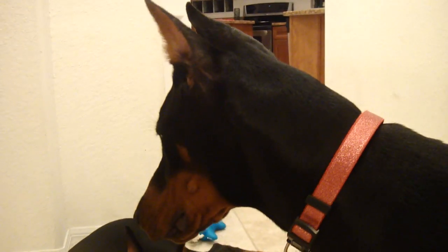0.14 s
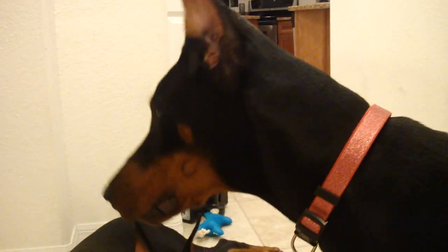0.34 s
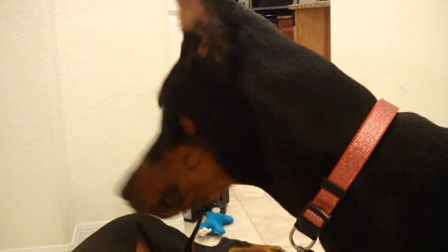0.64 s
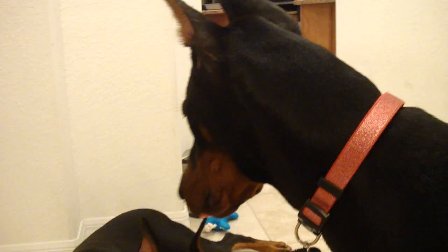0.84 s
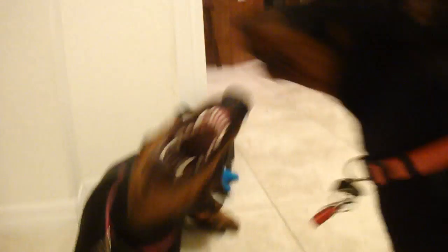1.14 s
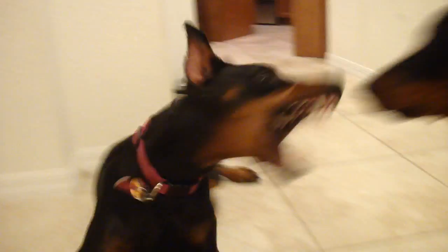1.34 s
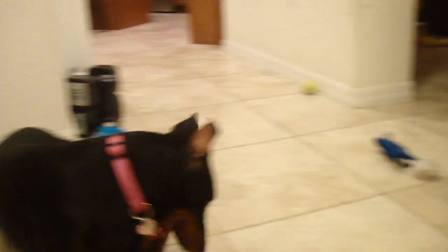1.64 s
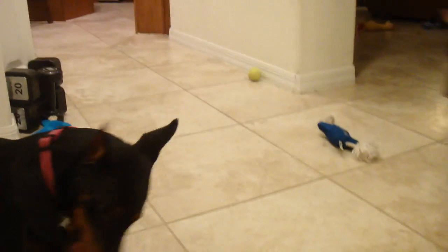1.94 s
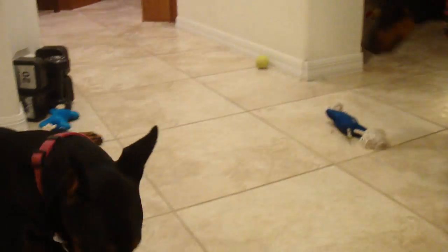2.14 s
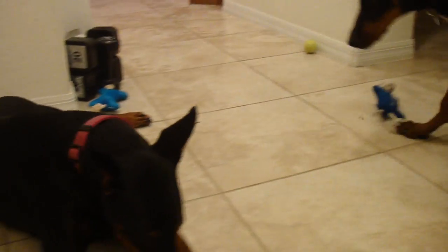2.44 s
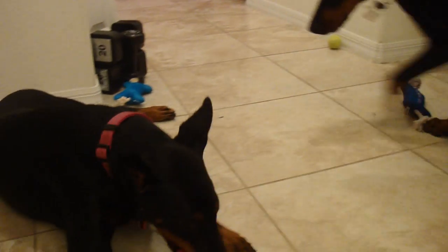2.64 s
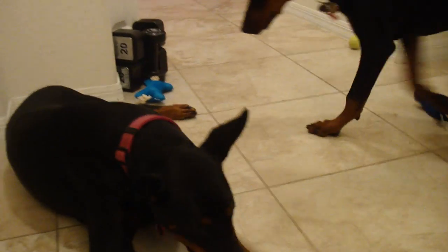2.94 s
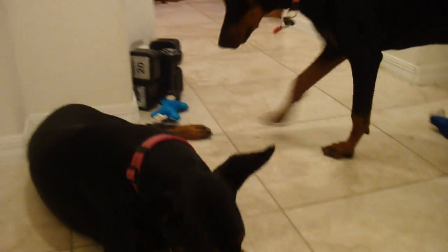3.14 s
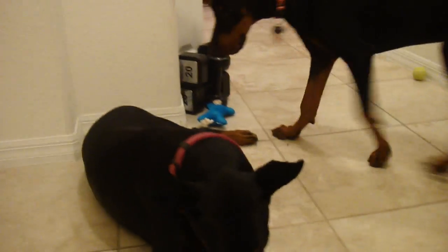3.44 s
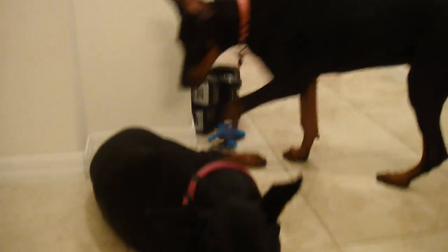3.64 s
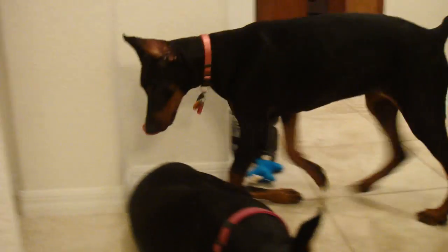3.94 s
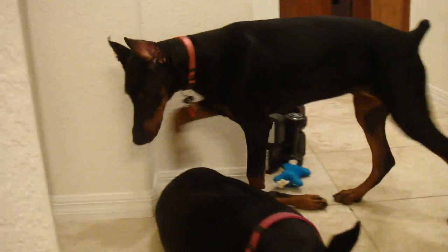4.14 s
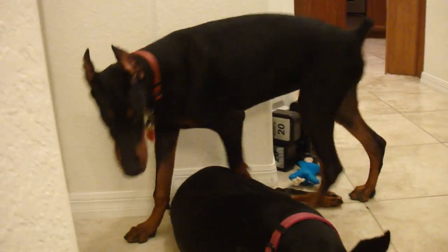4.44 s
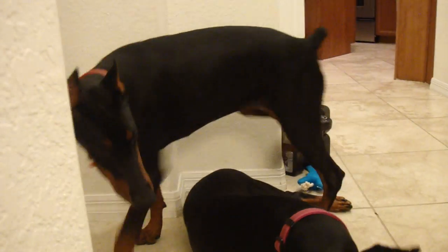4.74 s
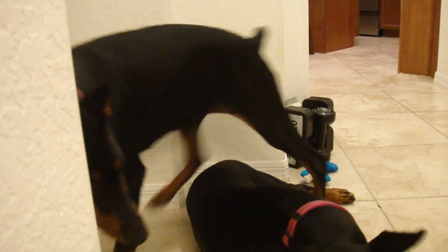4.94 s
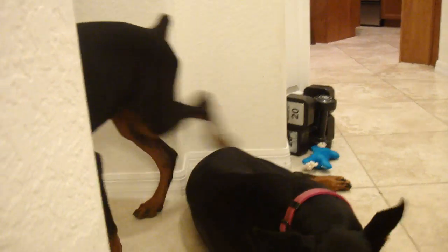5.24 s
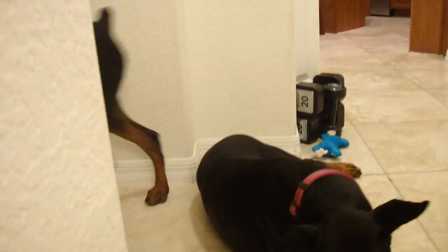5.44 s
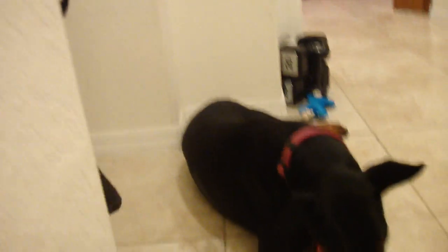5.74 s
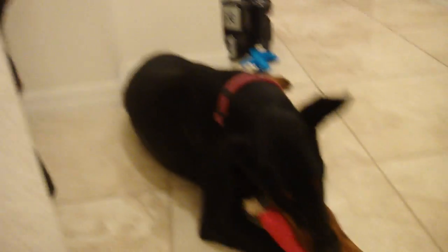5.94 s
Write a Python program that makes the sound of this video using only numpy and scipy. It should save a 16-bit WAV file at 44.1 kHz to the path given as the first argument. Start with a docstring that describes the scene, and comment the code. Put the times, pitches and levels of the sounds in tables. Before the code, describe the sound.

For the first second there is only soft room hiss and a very faint low hum, with a tiny click just before 0.9. At about 1.05 a sharp knock and a snarling burst break out, with further rough bursts near 1.17, 1.36 and 1.52, mixed with claw and tooth clicks and bright collar-tag clinks. A heavy, dull thump lands on tile at 1.72 and rings in the room. Scrabbling fades while tags jingle irregularly until about 2.7, with small scuffs near 2.4. From 2.75 a close rubber toy is chewed: quick squeaks at roughly 3.1, 3.7, 4.0, 4.4, 4.9 and 5.4 flip upward and fall, the one at 4.9 highest and shrillest. Steadier, nasal refill squeaks answer between them, the last just before 6. Light tag rattle and a click at 5.2 accompany the chewing.

```python
"""A rubber squeaker is chewed by one of two dogs, after a snarling scuffle on a tiled floor and a toy's thump.
Each bite drives its reed up in pitch and back; the toy refilling gives a steadier note. Both are harmonic
series filtered by toy, tube and jaws. Collar tags jingle as struck damped modes. Snarls and scrabbling are
bursts of filtered grainy noise; clicks and thumps are short band-limited impacts. A reverberant room,
coloured noise and a far appliance's hum lie behind them, and a gain control follows the loud moments."""
import sys
import numpy as np
from scipy import signal
from scipy.fft import rfft, irfft, next_fast_len
from scipy.io import wavfile
from scipy.ndimage import uniform_filter1d

SR = 44100
rng = np.random.default_rng(int(sys.argv[2]) if len(sys.argv) > 2 else 0)


def master_out(mix):
    """Clip the mix to full scale and print it as 16-bit PCM to the path in sys.argv[1]."""
    frames = np.transpose(np.atleast_2d(mix))
    ceiling = np.clip(frames, -1, 1)
    pcm = np.round(ceiling * 32767).astype(np.int16)
    wavfile.write(sys.argv[1], SR, pcm)


N = 269010
CUTOFF_HZ = 11250   # top of the squeaker's harmonics and of the recorder's passband


def amp(db):
    """Decibels are logarithmic: 20 dB is a factor of ten in amplitude."""
    return 10 ** (np.asarray(db) / 20)


def rms_one(x):
    """Normalisation: divide by the root mean square."""
    return x / np.sqrt(np.mean(x ** 2) + 1e-20)


def at_hz(points, hz):
    """Interpolation of a (frequency [Hz], value) table on a logarithmic frequency axis."""
    points = np.array(points)
    return np.interp(np.log(np.maximum(hz, 1)), np.log(points[:, 0]), points[:, 1])


def band_pass(x, low_hz, high_hz, order=2):
    """Band limiting: keep what lies between two edges."""
    return signal.sosfilt(signal.butter(order, [low_hz, high_hz], "band", fs=SR, output="sos"), x)


def high_pass(x, hz, order=2):
    """High-pass filtering: weaken what lies below the edge."""
    return signal.sosfilt(signal.butter(order, hz, "high", fs=SR, output="sos"), x)


def coloured(x, spectrum):
    """Spectral shaping: multiply the Fourier transform by a gain curve, then bring the rms to 1."""
    size = next_fast_len(len(x))
    gain = amp(at_hz(spectrum, np.fft.rfftfreq(size, 1 / SR)))
    return rms_one(irfft(rfft(x, size) * gain, size)[:len(x)])


def add(out, s, sound):
    """Superposition: mix a short sound in at time s."""
    i = int(round(s * SR))
    out[i:i + len(sound)] += sound[:N - i]


def squeaks(courses, colour, air_db, shadow_width_hz, rasp, uneven_db, rise_s):
    """Source and filter: a reed's harmonics are coloured by toy, tube and jaws; air hisses at each opening."""
    # modes of the squeaker tube: (frequency [Hz], half width [Hz])
    tube = [(2400, 230), (4200, 225), (6300, 350)]
    out = np.zeros(N)
    k = np.arange(1, 14)[:, None]   # harmonic numbers
    for s, *columns, (*lifts, shadow_hz, shadow_db) in courses:
        t = np.arange(s[0], s[-1], 1 / SR)
        hz, level_db, bright = [np.interp(t, s, c) for c in columns]
        # the reed beats unevenly
        flutter = rms_one(uniform_filter1d(rng.standard_normal(len(t)), size=50))
        phase = 2 * np.pi * np.cumsum(hz * (1 + rasp * flutter)) / SR
        # each harmonic sways a little in level on its own, at random
        sway = rms_one(uniform_filter1d(rng.standard_normal((13, len(t))), size=400, axis=1))
        tube_db = sum(lift / (1 + ((k * hz - mode) / width) ** 2)
                      for lift, (mode, width) in zip(lifts, tube))
        jaw_db = shadow_db / (1 + ((k * hz - shadow_hz) / shadow_width_hz) ** 2)
        gains_db = at_hz(colour, k * hz) + bright * np.log2(k) + tube_db + jaw_db + uneven_db * sway
        gains = amp(gains_db) * (k * hz < CUTOFF_HZ)
        gains = gains / np.sqrt(np.sum(gains ** 2, axis=0) / 2)   # total power 1 at every moment
        tone = np.sum(gains * np.sin(k * phase + 0.388 * k ** 2), axis=0)
        air = amp(air_db) * (1 + np.cos(phase)) * coloured(rng.standard_normal(len(t)), colour)
        edge = np.clip(np.minimum((t - s[0]) / rise_s, (s[-1] - t) / 0.0031), 0, 1)
        add(out, s[0], amp(level_db) * edge * (tone + air))
    return high_pass(out, 450)


def bite_course(s, climb, climb_hz, top_hz, leave_hz, over, length, last_hz, db, top_db, tail_db,
                top_bright, tail_bright, *grip):
    """An overblown reed leaps in regime: climb, leap, drop, sag, as time, pitch, level and brightness."""
    open_hz, pop_db, pop_s = 973, 6, 0.0024   # the reed opens with a pop
    open_bright, climb_bright, end_dulling = -0.68, 3.2, -3.5   # dB per octave
    # leaps most of the way, crests part-way through the overblown note and tires
    leap_s_per_octave, leap_share, crest_share, tire_db = .005, .9, .45, -4
    # falls back to near the settled pitch, settles, then sags to the last pitch
    drop_s, drop_share, settle_s, settle_hz, settle_db = .004, 0.1674, 0.00922, 1021, 5.5
    break_db_per_octave = -10   # the note breaks up in the middle of each leap and drop
    out = climb + over
    pop = min(pop_s, climb / 2)
    up, down = np.log2(top_hz / climb_hz), np.log2(leave_hz / settle_hz)   # octaves
    leap = leap_s_per_octave * up
    leapt_hz = climb_hz + leap_share * (top_hz - climb_hz)
    dropped_hz = settle_hz + drop_share * (leave_hz - settle_hz)
    leaping_db = top_db + break_db_per_octave * up
    tired_db = top_db + tire_db
    dropping_db = tired_db + break_db_per_octave * down
    rows = [(0, open_hz, db + pop_db, open_bright),
            (pop, open_hz + (climb_hz - open_hz) * pop / climb, db, climb_bright),
            (climb, climb_hz, db, climb_bright),
            (climb + leap / 2, (climb_hz + leapt_hz) / 2, leaping_db, top_bright),
            (climb + leap, leapt_hz, top_db, top_bright),
            (climb + crest_share * over, top_hz, top_db, top_bright),
            (out, leave_hz, tired_db, top_bright),
            (out + drop_s / 2, (leave_hz + dropped_hz) / 2, dropping_db, top_bright),
            (out + drop_s, dropped_hz, tail_db + settle_db, tail_bright),
            (out + settle_s, settle_hz, tail_db, tail_bright),
            (length, last_hz, tail_db, tail_bright + end_dulling)]
    t, hz, level, bright = np.transpose(rows)
    return s + np.maximum.accumulate(t), hz, level, bright, grip


def toy_bites():
    """Pressure drives the reed: each bite forces its pitch up into an overblown note and lets it fall."""
    # bites on the toy: (time [s], climb [s], pitch climbed to [Hz], overblown pitch [Hz],
    # pitch it leaves at [Hz], overblown time [s], whole length [s], last pitch [Hz], level [dB],
    # overblown level [dB], tail level [dB], overblown brightness [dB per octave],
    # tail brightness [dB per octave], lift of the three tube modes [dB, dB, dB],
    # band altered by the jaws [Hz], its change [dB])
    rows = [(2.745, .011, 1294, 2100, 2010, 0.012, 0.082, 880, -15, -13, -24.5, 1, 1, 7.5, -12, 1, 8200, -5),
            (3.132, .011, 1276, 1452, 1291, 0.0082, 0.057, 899, -15, -18.5, -21.5, 3.5, 2.3, 1, -2, -2.5, 8900, -12),
            (3.669, 0.012, 1409, 2103, 2042, .013, .066, 856, -16, -15.5, -21, 0.8, -1, 4.5, 3.5, 10, 1830, 3.5),
            (4.034, 0.011, 1325, 2047, 2012, 0.015, 0.076, 860, -14, -16, -24.5, 0.8, 0, 1.5, 3, 5.5, 1820, 2.5),
            (4.426, 0.00845, 1033, 1105, 1156, 0.013, .066, 928, -16.5, -15, -21.5, 2.5, 1.5, -2.5, 3.5, 6, 2850, 3.5),
            (4.881, 0.0055, 1678, 3930, 3356, 0.027, 0.058, 830, -13.5, -11, -26, -5, 7, -1, 15, 2, 1977, 7),
            (5.374, 0.0094, 1230, 1721, 1663, 0.011, 0.069, 894, -15, -15, -22.5, -2.5, 0.5, -2, 7.5, 2, 2530, -1)]
    # colour of the toy flattened under the teeth: (frequency [Hz], level [dB])
    colour = [(350, -49), (700, 9), (1000, 8), (1500, -3), (2300, 0), (3100, -2), (4100, 3), (5200, -4),
              (6300, -3.5), (7500, -2), (9000, -8.5), (11000, -24)]
    return squeaks([bite_course(*row) for row in rows], colour, air_db=-26.5, shadow_width_hz=870,
                   rasp=0.0082, uneven_db=1.0, rise_s=0.0013)


def refill_course(s, length, first_hz, until, mid_hz, last_hz, before, first_db, mid_db, last_db,
                  bright, *grip):
    """A reed under steady flow holds its pitch: three held pitches with glides between them."""
    scoop_s, scoop_hz, scoop_db = 0.0054, 79, -1.5   # scoops up to pitch
    glide_s = 0.0099   # glides between holds
    fade_s, fade_hz, fade_db = 0.01, 57, -2   # sinks at the end
    first_bright = 0.85   # the first hold is this much brighter, dB per octave
    last = length - before
    t = np.array([0, scoop_s, until, until + glide_s, last - glide_s, last, length - fade_s, length])
    t = np.minimum(np.maximum.accumulate(t), length)
    hz = [first_hz - scoop_hz, first_hz, first_hz, mid_hz, mid_hz, last_hz, last_hz, last_hz - fade_hz]
    level = [first_db + scoop_db, first_db, first_db, mid_db, mid_db, last_db, last_db, last_db + fade_db]
    return s + t, hz, level, bright + first_bright * (t <= until), grip


def toy_refills():
    """Inflow drives the reed: the toy swelling back sounds a note steadier than a bite."""
    # the toy refills: (time [s], length [s], first pitch [Hz], held until [s after the start],
    # middle pitch [Hz], last pitch [Hz], reached before the end [s], first level [dB],
    # middle level [dB], last level [dB], brightness [dB per octave],
    # lift of the three tube modes [dB, dB, dB], band altered by the jaws [Hz], its change [dB])
    rows = [(2.926, 0.074, 856, 0.032, 866, 782, 0.018, -25, -21, -25, -0.92, 7, 6.5, -20, 1690, -1.5),
            (3.446, 0.019, 918, .005, 807, 820, 0.0014, -17.5, -27.5, -25, 1.7, 0.5, 2, 14, 5600, -10),
            (3.842, 0.084, 934, 0.016, 884.2, 909, 0.015, -16, -15, -15.5, 0.8, 4.5, -3, 2, 8850, -0.5),
            (4.194, 0.089, 921, 0.014, 895, 917, 0.011, -16, -14, -13.5, 0.44, -6, 1, -3, 8800, -0.5),
            (4.673, 0.053, 905, 0.0079, 887, 901, 0.017, -15.5, -17, -17, 1.1, -15, 2, -3, 9200, 4),
            (5.012, 0.092, 891, 0.016, 839.4, 893, 0.043, -20.5, -20, -18.5, 1.5, -3.5, 8.5, 0, 6370, 1),
            (5.507, .034, 903, 0.0097, 885, 836, 0.0077, -17, -21, -17.5, 2.3, -19, 1, -1, 10500, -15),
            (5.576, 0.04, 899, 0.0099, 894, 920, 0.01, -16, -15.5, -13.5, 0.77, -16, 5, 4, 6600, 2),
            (5.97, 0.065, 912, 0.027, 895.6, 906, 0.008, -16, -14.5, -15, 0.59, 5, 11, 6.5, 5260, -8.5)]
    # colour of the toy swelling back: (frequency [Hz], level [dB])
    colour = [(350, -26), (700, 11.5), (1000, 3), (1800, -5.5), (2700, -6), (3600, -11.5), (4500, -14.5),
              (5400, -16), (6300, -27.5), (7200, -22), (9000, -20.5), (11000, -31)]
    return squeaks([refill_course(*row) for row in rows], colour, air_db=-25.0, shadow_width_hz=810,
                   rasp=.0035, uneven_db=1.66, rise_s=0.002)


def scuffle(grain_db, sway_db):
    """Modulated noise: dense uneven grains, in a low and a high part, rise and fall exponentially."""
    # bursts of snarl and scrabbling: (loudest at [s], level [dB], rise [dB per s], fall [dB per s],
    # treble share [dB])
    bursts = [(1.02, -58, 246, 70, 8.5), (1.06, -18, 2500, 844, -41), (1.098, -26.5, 503, 116, -15),
              (1.15, -32.5, 211, 141, -1), (1.173, -19.5, 400, 248, -11), (1.358, -22, 900, 600, -21),
              (1.522, -26, 323, 287, -17), (1.575, -45, 900, 2500, 12), (1.702, -37, 2000, 1993, -4),
              (1.78, -36, 300, 56.5, -1.5), (2.35, -44.5, 70, 253, -4), (2.442, -39.5, 2002, 330, -40),
              (2.55, -45, 25, 1512, -20)]
    # spectra of the two parts, relative: (frequency [Hz], level [dB per Hz])
    low_spectrum = [(150, -22.5), (450, -9), (750, -3.9), (1250, 7.5), (1800, -1.7), (2200, 4.5), (2600, 3),
                    (3200, -7), (3750, -16.5), (5000, -24)]
    high_spectrum = [(3600, -34), (4100, -14), (4500, 0), (5800, -2), (6600, -7), (8700, -12), (11000, -17)]
    # edges of three throat resonances [Hz], which swell and fade each on its own
    throat_edges_hz = (150, 1250, 2200, 5000)
    t, low, high, throat = np.arange(N) / SR, 0, 0, 0
    for s, level_db, rise, fall, treble_db in bursts:
        burst = amp(level_db - np.where(t < s, rise * (s - t), fall * (t - s)))
        low = low + burst
        high = high + amp(treble_db) * burst
    unevenness = rms_one(uniform_filter1d(rng.standard_normal(N), size=110))
    grains = rng.standard_normal(N) * amp(grain_db * unevenness)
    body = coloured(grains, low_spectrum)
    for low_hz, high_hz in zip(throat_edges_hz, throat_edges_hz[1:]):
        sway = rms_one(uniform_filter1d(uniform_filter1d(rng.standard_normal(N), size=600), size=600))
        throat = throat + amp(sway_db * sway) * band_pass(body, low_hz, high_hz)
    return low * rms_one(throat) + high * coloured(grains, high_spectrum)


def ring(blows, hz, t60):
    """Damped resonance: a two-pole filter turns a unit blow into a dying sine of height about 1."""
    r, w = amp(-60 / (t60 * SR)), 2 * np.pi * hz / SR
    return signal.lfilter([0, np.sin(w)], [1, -2 * r * np.cos(w), r * r], blows + 1e-18)


def tags(clink_db, tick_db, ring_db, rattle_db, rustle_db, per_s):
    """Modal excitation: touches clink and set the tags' modes ringing; small random ones rattle in between."""
    # collar tags touch: (time [s], relative level [dB], clink [Hz],
    # tag that rings most [index, rounded; outside 0-3 none is favoured], relative ring level [dB])
    touches = [(1.0999, -19, 10700, 0, -30), (1.2496, -18, 9700, 0, -30), (1.284, -11, 10040, 1, -49),
               (1.3483, -47, 10500, 2, -28), (1.3703, -10.5, 10040, 1, -20), (1.379, -25, 7030, 0, -25),
               (1.3861, -8.5, 7070, 0, -18.5), (1.4144, -23, 7680, -0.5, -18.5), (1.504, -16, 9650, 2, -33),
               (1.5299, -11, 10660, 2, -41), (1.5654, -14, 7840, 0, -29), (1.5854, -14, 7800, 1, -48),
               (1.6008, -4.5, 10540, 2, -32), (1.6444, -15, 8060, 1, -39), (1.6636, -8, 6830, 1, -37),
               (1.7973, -40, 10100, 2, -17), (1.8412, -16, 8500, 0, -26), (1.8632, -13.5, 7790, 1, -20),
               (1.8961, -12, 10100, 2, -31.5), (1.928, -13, 10050, 1, -34), (1.9475, -19, 8100, 0, -32),
               (2.0233, -13, 8840, 14, -33), (2.0378, -13, 9360, 2, -22), (2.1665, -9, 10000, 2, -24),
               (2.1754, -22, 9650, 1, -18.5), (2.2074, -23, 9840, 3, -17), (2.3715, -23, 9000, 0, -22.5),
               (2.386, -47, 10100, 2, -20), (2.3994, -14, 10220, 2, -38), (2.4753, -24, 9700, 2, -25),
               (2.5197, -16, 9640, 2, -10.5), (2.5416, -8.5, 10300, 2, -29), (2.5894, -16.5, 9440, 2, -23),
               (2.6304, -16.5, 9240, 2, -23), (2.6898, -21.5, 8600, 1, -38), (2.9063, -9.5, 9000, 2.5, -17),
               (2.9277, -11, 10400, 2, -35), (3.0435, -23, 7200, -0.5, -39), (3.1994, -48, 9960, 2, -21.5),
               (3.928, -20, 10400, 0, -29), (4.7935, -22, 6670, 1, -35), (5.307, -27, 10500, 1, -40),
               (5.8247, -32, 10300, 1, -37)]
    # modes of each of four tags: (frequency [Hz], relative level [dB], t60 [s])
    tag_modes = [
        [(5790, -13.5, 0.069), (5754, -5, 0.055), (6370, -2, 0.041)],
        [(7360, -4, 0.047), (8100, -1.5, 0.03)],
        [(10100, -17, 0.016), (10060, -4.5, 0.098), (10040, -5, 0.026)],
        [(6350, -7.5, 0.08)],
    ]
    # loose rattling of tags, rings and fur: (time [s], relative level [dB])
    rattle = [(0.95, -46), (1.03, -31.5), (1.29, -29), (1.74, -21), (2.05, -25), (2.17, -27), (2.48, -40),
              (2.9, -31), (3.12, -35), (3.33, -26), (3.46, -45.5), (3.85, -31), (4.25, -36), (5.101, -46),
              (5.32, -36), (5.66, -48), (5.85, -39), (6.1, -53)]
    other_tags_db = -15   # the tags not struck ring in sympathy
    table = np.array(touches)
    at = np.round(table[:, 0] * SR).astype(int)
    loose = amp(np.interp(np.arange(N) / SR, *np.transpose(rattle), left=-120, right=-120))
    out = np.zeros(N)
    for tag, modes in enumerate(tag_modes):
        spread_db = rng.normal(0, 3, (len(at), len(modes)))
        struck_db = table[:, 4] + ring_db + other_tags_db * (np.round(table[:, 3]) != tag)
        for k, (hz, level_db, t60) in enumerate(modes):
            blows = amp(rattle_db) * loose * (rng.random(N) < per_s / SR) * rng.standard_normal(N)
            blows[at] += amp(struck_db + spread_db[:, k])
            out += amp(level_db) * ring(blows, hz, t60)
    t = np.arange(0, .04, 1 / SR)
    for s, level_db, hz, *_ in touches:
        add(out, s, amp(level_db + clink_db - 60 * t / 0.024) * np.sin(2 * np.pi * hz * t))
    # noisy ticks of the touches, and about 1500 a second from the links of the rings
    tick = np.zeros(N)
    tick[at] = amp(table[:, 1] + tick_db)
    tick += amp(rustle_db) * loose * (rng.random(N) < 1500. / SR) * rng.exponential(1, N)
    decay = signal.lfilter([1], [1, -amp(-60 / (0.002 * SR))], tick + 1e-18)   # t60 of 2 ms
    return out + high_pass(decay * rng.standard_normal(N), 5500)


def clicks():
    """Impact noise: a dying crack, kept to the band in which claw, tooth and tile ring."""
    # claws and teeth click: (time [s], peak level [dB], low edge [Hz], high edge [Hz], t60 of the crack [s])
    rows = [(0.884, -41, 1400, 2350, 0.062), (1.0565, -8, 510, 3960, 0.019), (1.096, -16, 600, 2780, 0.026),
            (1.176, -7.5, 1130, 2870, 0.02), (1.35, -20, 885, 3520, 0.007), (1.386, -28, 900, 4030, 0.009),
            (1.503, -16.5, 990, 5000, 0.036), (1.536, -18.5, 2510, 4670, 0.014),
            (1.572, -11, 2300, 2950, 0.008), (1.572, -10, 3880, 4410, 0.008),
            (1.602, -12.5, 1520, 7160, 0.0079), (1.714, -14.5, 1180, 4870, 0.14),
            (2.024, -24.5, 2100, 3480, 0.014), (2.038, -33.5, 2220, 4960, 0.013),
            (2.376, -26, 2190, 5100, 0.013), (2.437, -26, 490, 2780, 0.039),
            (2.545, -30, 2460, 5950, 0.0091), (3.045, -28, 300, 1500, 0.026),
            (5.222, -14.5, 1114, 3600, 0.022), (5.96, -27.5, 710, 3780, 0.057)]
    out, t = np.zeros(N), np.arange(0, .04, 1 / SR)
    for s, peak_db, low_hz, high_hz, t60 in rows:
        crack = band_pass(amp(-60 * t / t60) * rng.standard_normal(len(t)), low_hz, high_hz)
        add(out, s, amp(peak_db) * crack / np.max(np.abs(crack)))
    return out


def thumps():
    """Impulse response: a single push on the tiles, kept to the band in which the toy is heard."""
    # dull thumps on the floor: (time [s], peak level [dB], low edge [Hz], high edge [Hz])
    rows = [(1.058, -6, 374, 1350), (1.718, -7, 133, 1170), (1.7216, -6, 106, 730), (1.774, -31, 78.5, 238)]
    out, push = np.zeros(N), signal.unit_impulse(SR // 10)
    for s, peak_db, low_hz, high_hz in rows:
        thud = band_pass(push, low_hz, high_hz, order=3)
        add(out, s, amp(peak_db) * thud / np.max(np.abs(thud)))
    return out


def room(x, gap_s, build_s):
    """Reverberation: convolution with octave bands of noise, each dying at its own rate; energy 1."""
    # reverberation time: (frequency [Hz], t60 [s])
    room_t60 = [(100, 1.18), (300, 0.84), (900, 0.98), (2000, 1.09), (2900, 0.88), (5000, 0.29),
                (10000, 0.42)]
    t, tail = np.arange(0, 1.2, 1 / SR), 0
    for low in 22.5 * 2. ** np.arange(9):
        band = band_pass(rng.standard_normal(len(t)), low, 2 * low)
        tail = tail + band * amp(-60 * t / at_hz(room_t60, low * np.sqrt(2)))
    tail = tail * np.clip((t - gap_s) / build_s, 0, 1)
    return signal.fftconvolve(x, tail / np.sqrt(np.sum(tail ** 2)))[:N]


def room_tone():
    """Stationary noise: a steady background of fixed spectrum."""
    # relative spectrum: (frequency [Hz], level [dB per Hz])
    spectrum = [(15, -57), (25, -13), (87, -18.5), (107, -16), (231, -4.5), (269, -3.5), (356, 1),
                (426, -3.5), (472, -1.5), (509, -6), (564, -3.5), (8040, -22), (11200, -27.5), (14600, -66),
                (22000, -120)]
    return amp(-53.5) * coloured(rng.standard_normal(N), spectrum)


def appliance_hum():
    """Pure tones: a far appliance hums on steady sines."""
    # partials: (frequency [Hz], rms level [dB])
    partials = [(118.4, -79.5), (355.3, -98)]
    t = np.arange(N) / SR
    return sum(amp(db) * np.sqrt(2) * np.sin(2 * np.pi * hz * t) for hz, db in partials)


def scene():
    """Superposition of direct and reverberant sound: the toy is near; the thumps stir the room more."""
    bites, refills = toy_bites(), toy_refills()
    rough = scuffle(grain_db=0.9, sway_db=2.0)
    collar = tags(clink_db=-8.5, tick_db=1.0, ring_db=-2.5, rattle_db=-16, rustle_db=-14.5, per_s=100)
    ticks, thuds = clicks(), thumps()
    to_room = amp(-9.0) * bites + amp(-13.5) * refills + amp(-39.5) * rough
    to_room = to_room + amp(-5.5) * collar + amp(-12) * ticks + amp(-3) * thuds
    direct = bites + refills + rough + collar + ticks + thuds
    reverberant = room(to_room, gap_s=0.0006, build_s=0.026)
    return (direct + reverberant + room_tone() + appliance_hum())[None]


def record(dry):
    """Dynamic compression: deep bass is thinned, gain control follows the loud moments, the top is cut."""
    # the recorder turns down above the knee and recovers
    knee_db, slope, recovery_db_per_s = -11.5, 0.32, 24
    thin = high_pass(dry, 45, order=1)
    level_db = 10 * np.log10(2 * uniform_filter1d(thin ** 2, size=90) + 1e-12)
    wanted_cut_db = slope * np.maximum(level_db - knee_db, 0)
    # a running maximum on a rising ramp lets each cut fade at the recovery rate
    ramp = recovery_db_per_s * np.arange(N) / SR
    cut_db = np.maximum.accumulate(wanted_cut_db + ramp, axis=1) - ramp
    held = thin * amp(-uniform_filter1d(np.maximum(cut_db, 0), size=130, origin=64))
    return signal.sosfilt(signal.ellip(8, .5, 45, CUTOFF_HZ, fs=SR, output="sos"), held)


dry = scene()
out = record(dry)
master_out(out)
```